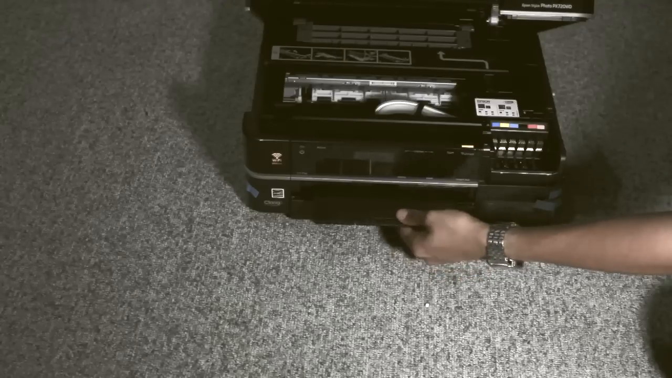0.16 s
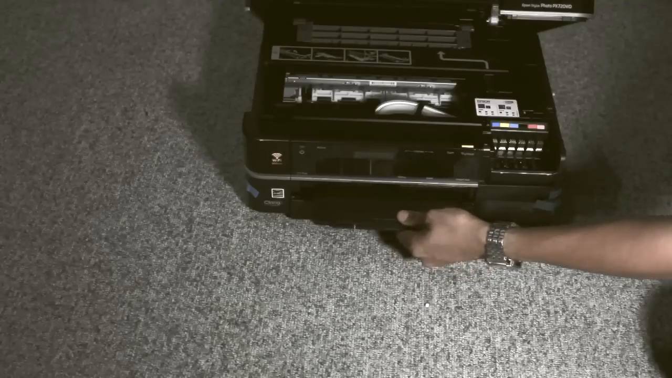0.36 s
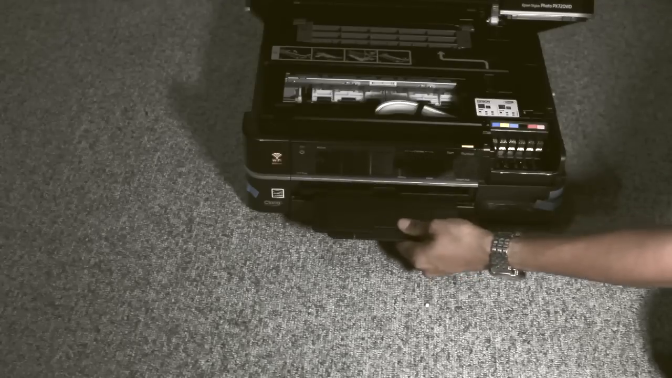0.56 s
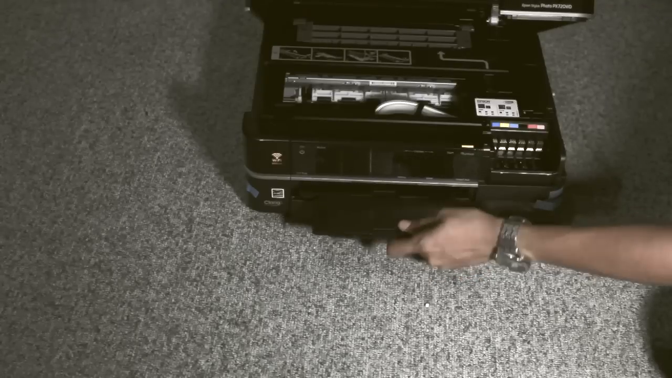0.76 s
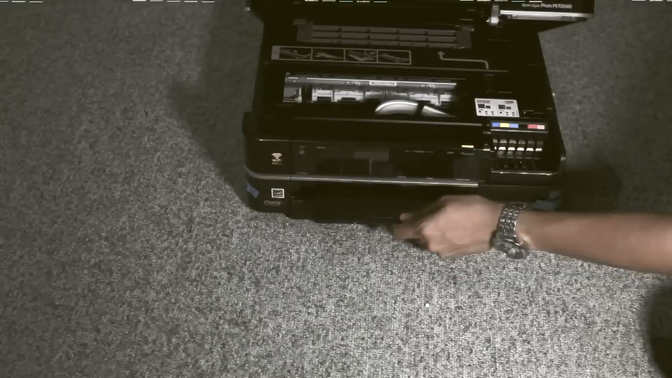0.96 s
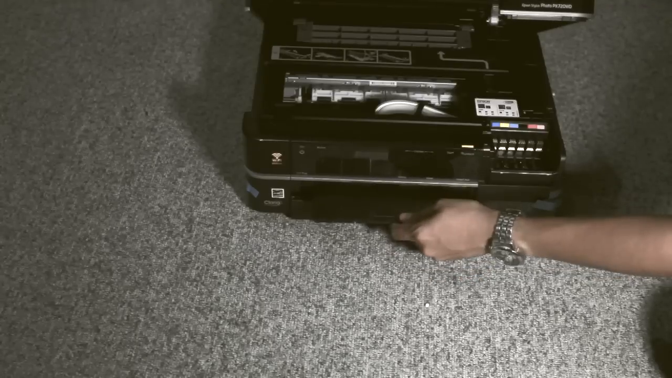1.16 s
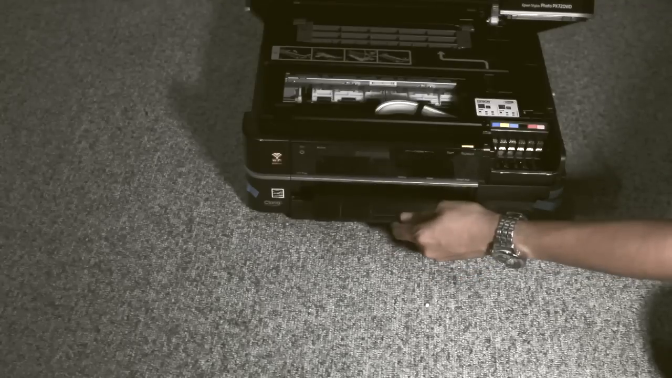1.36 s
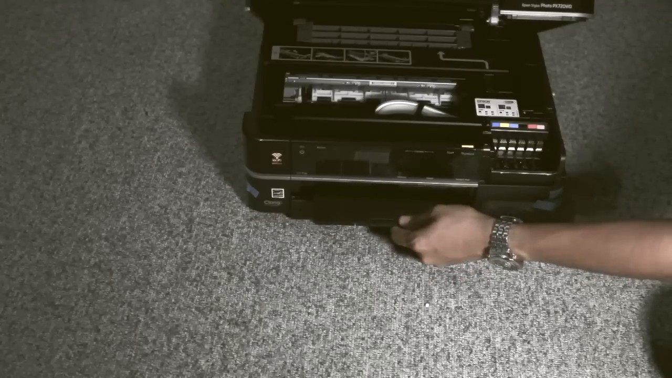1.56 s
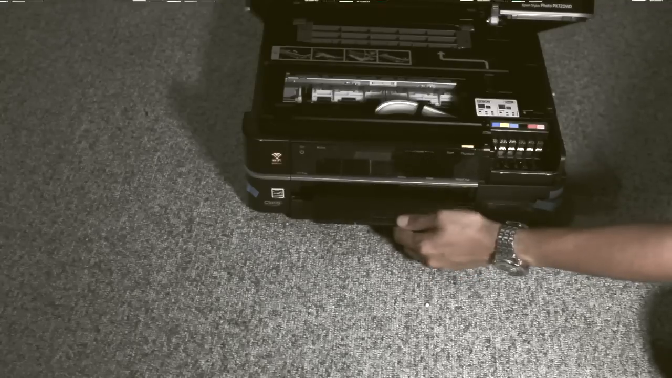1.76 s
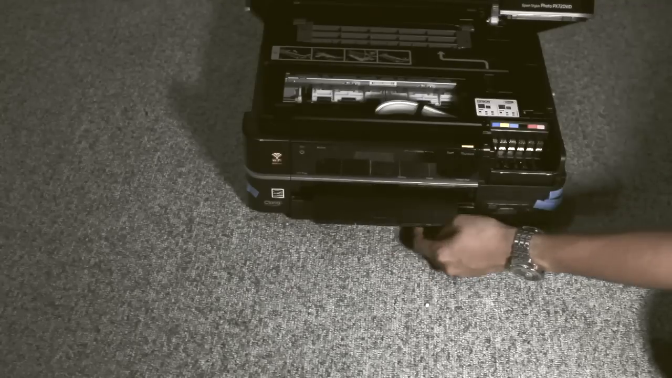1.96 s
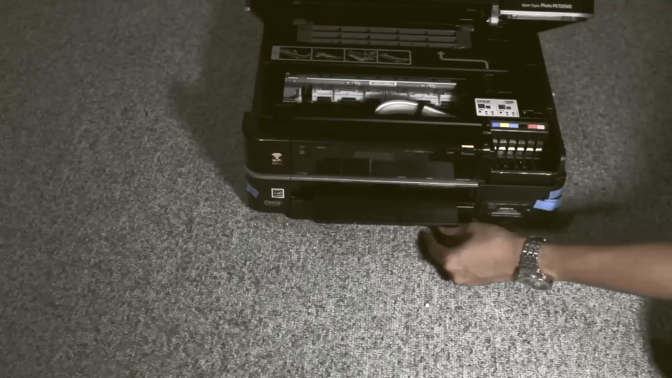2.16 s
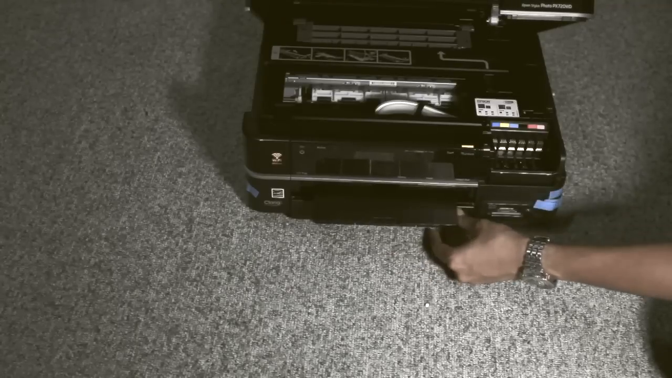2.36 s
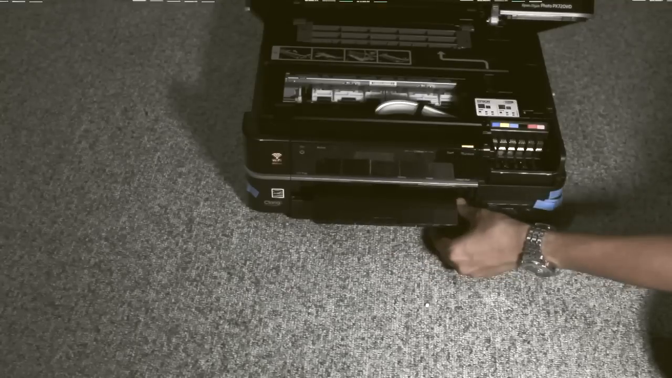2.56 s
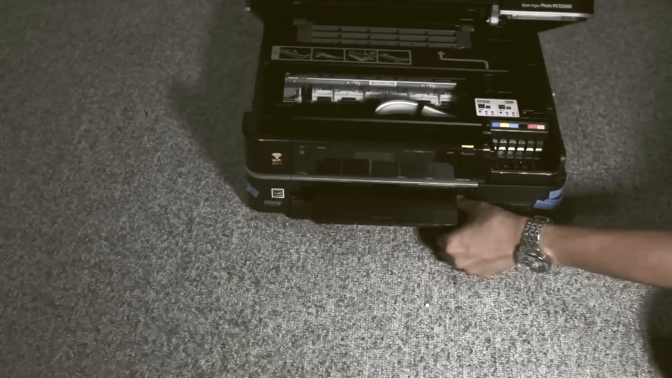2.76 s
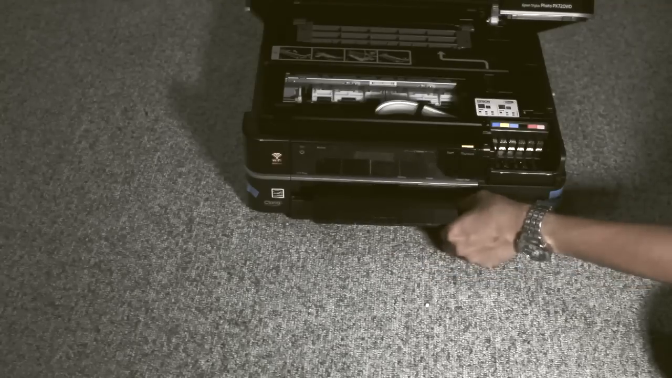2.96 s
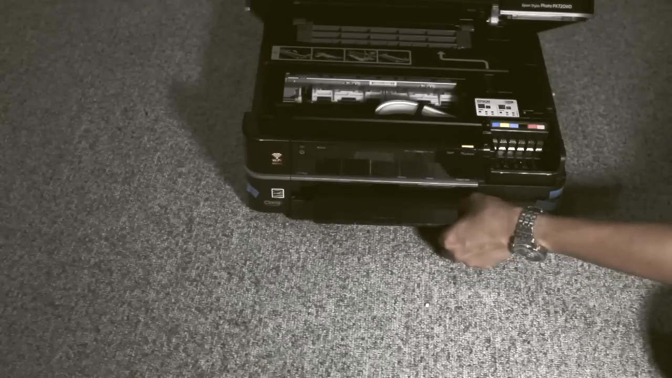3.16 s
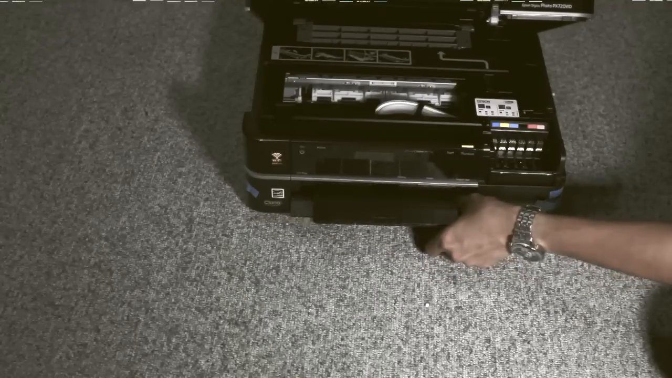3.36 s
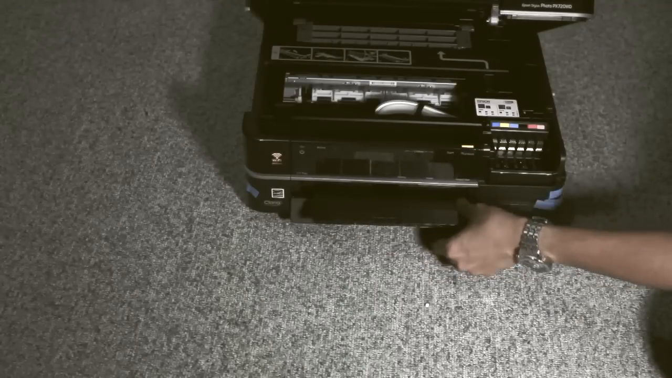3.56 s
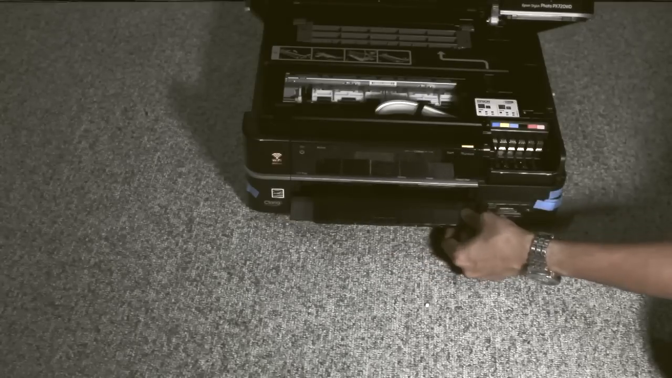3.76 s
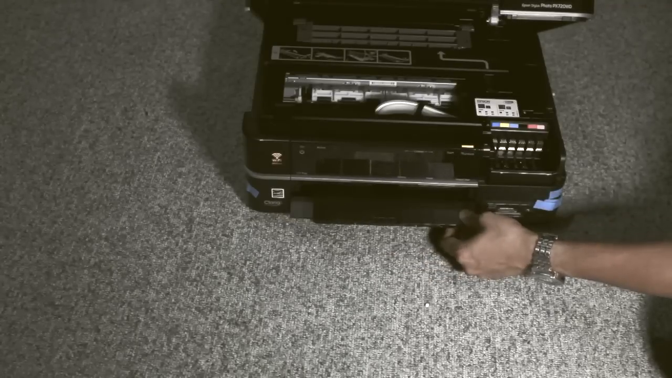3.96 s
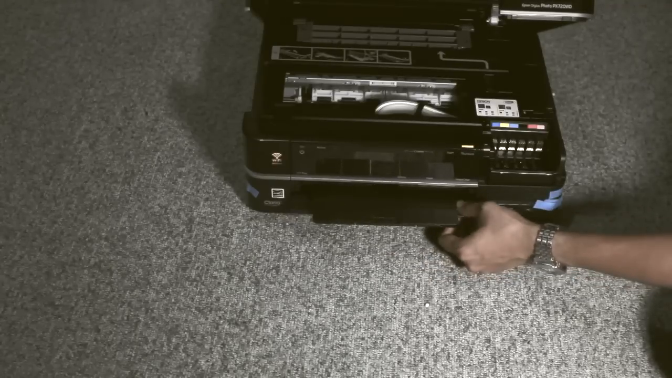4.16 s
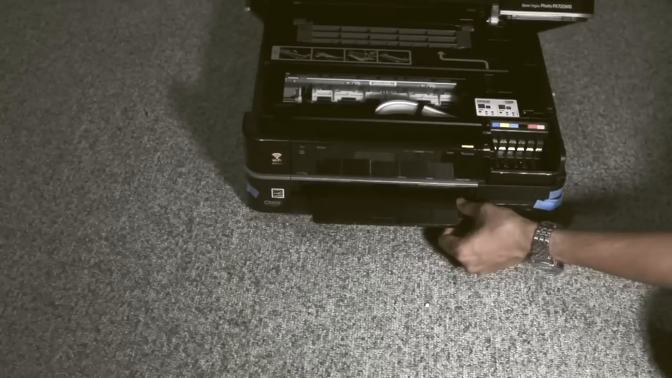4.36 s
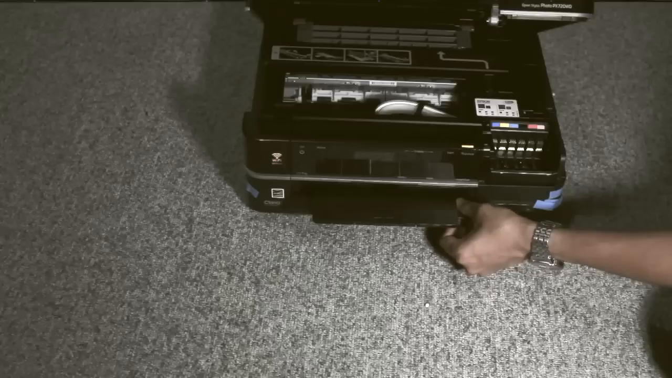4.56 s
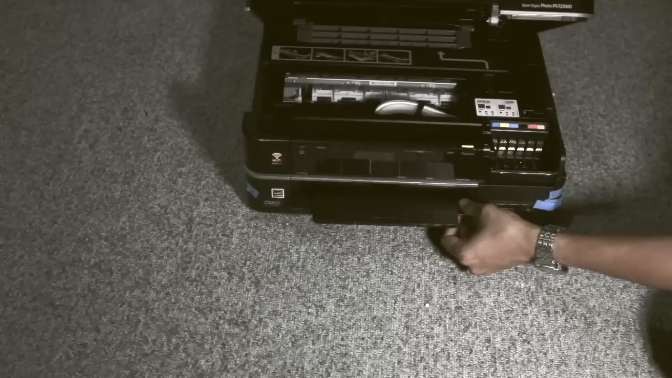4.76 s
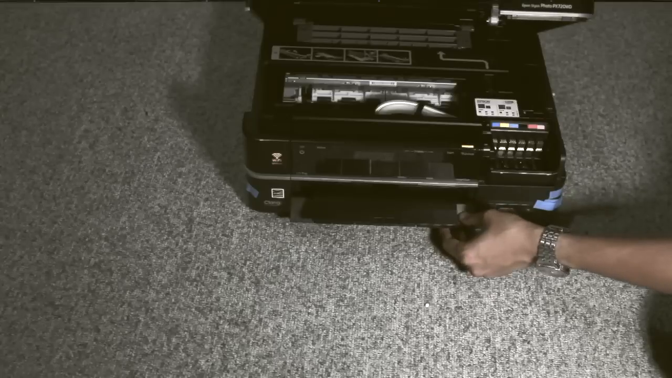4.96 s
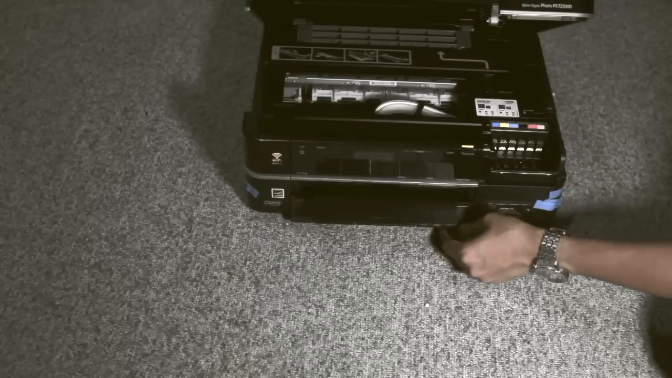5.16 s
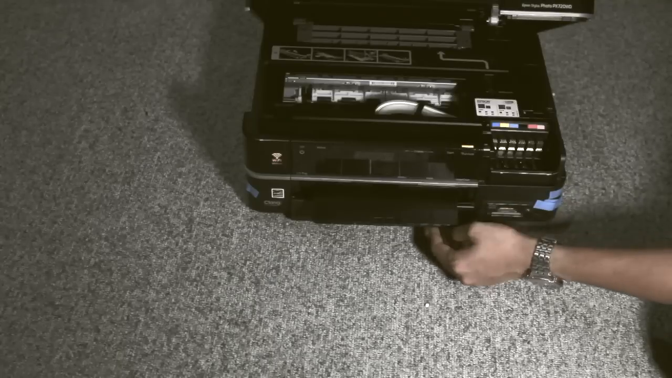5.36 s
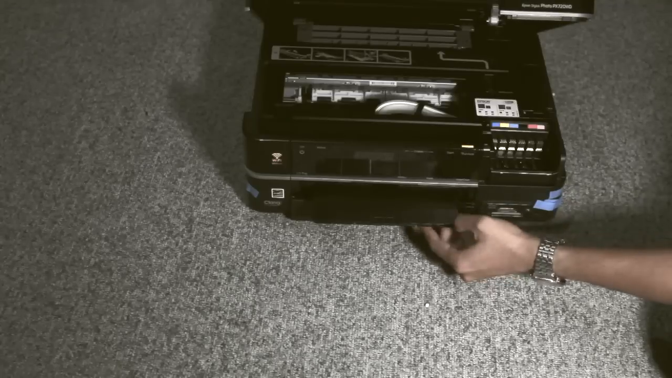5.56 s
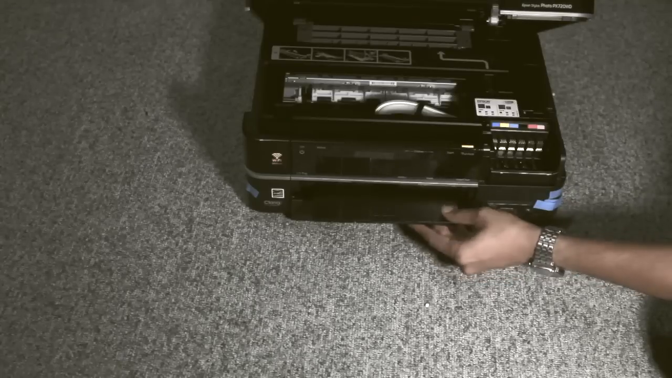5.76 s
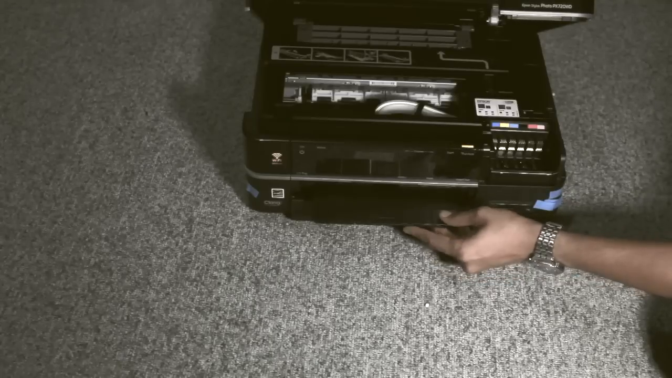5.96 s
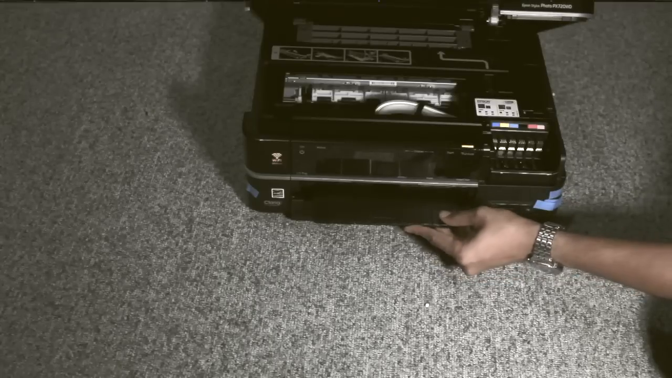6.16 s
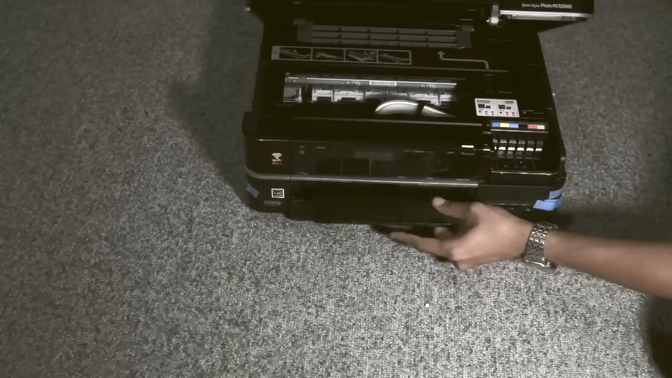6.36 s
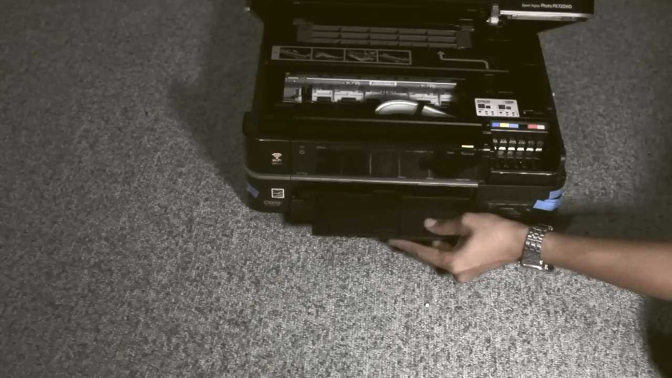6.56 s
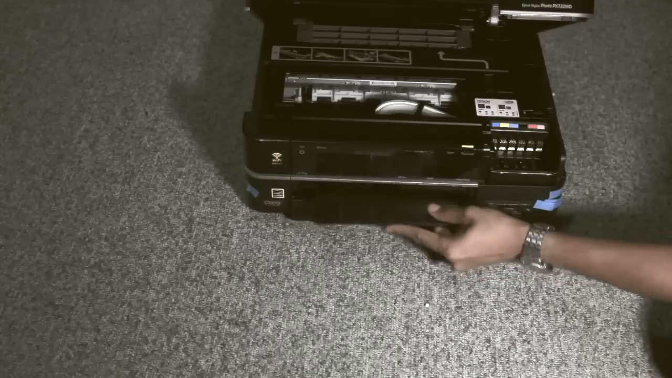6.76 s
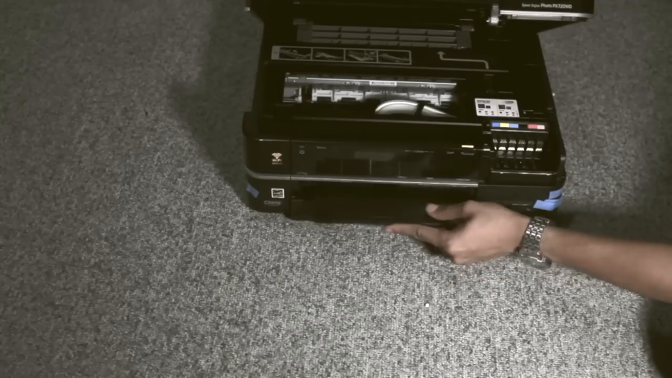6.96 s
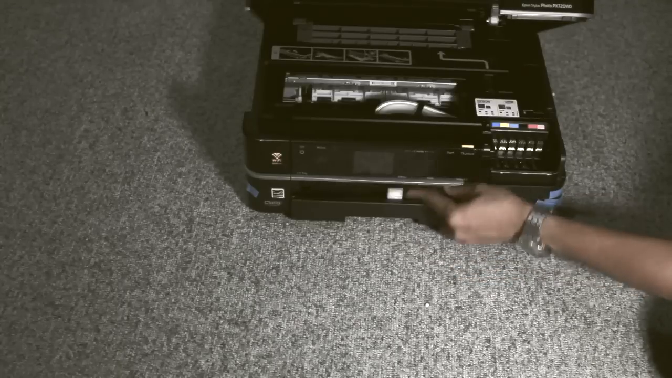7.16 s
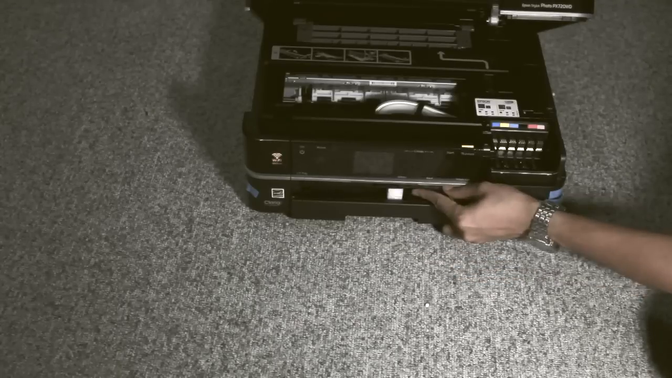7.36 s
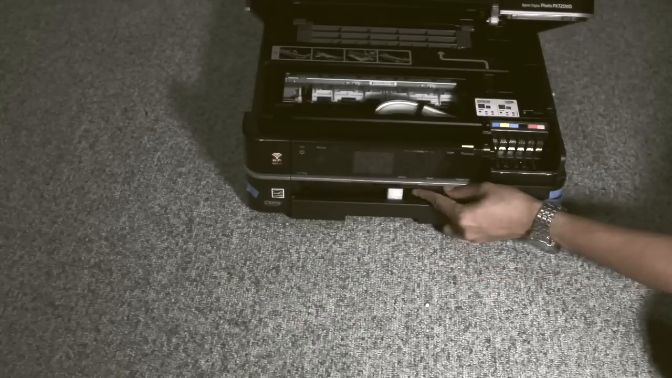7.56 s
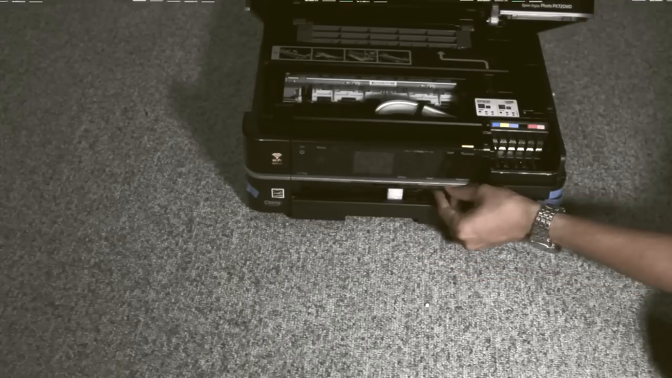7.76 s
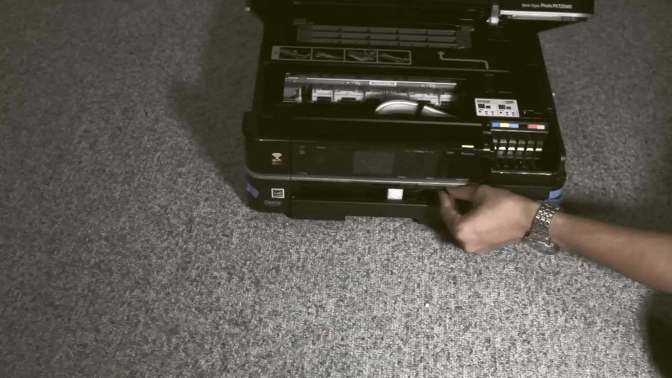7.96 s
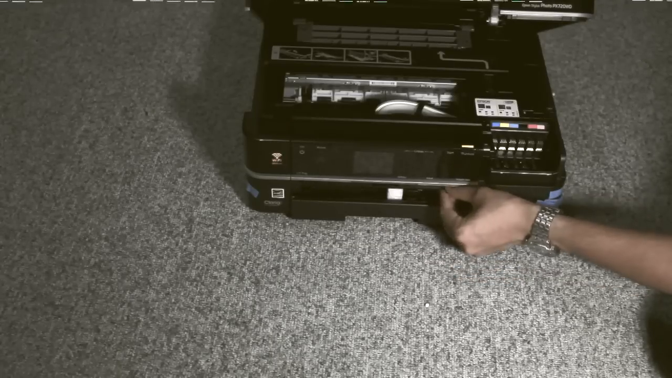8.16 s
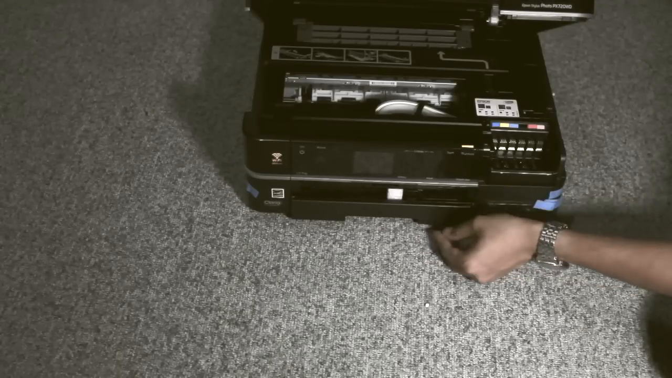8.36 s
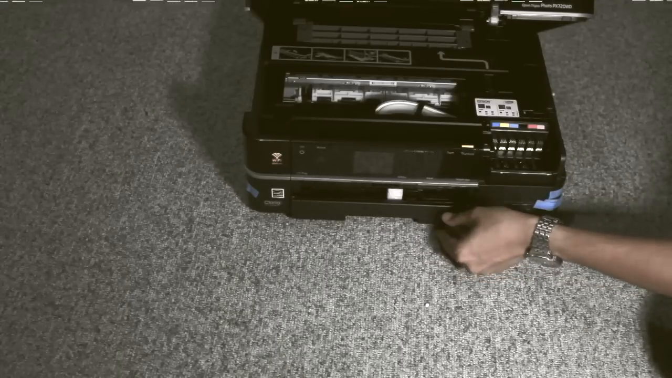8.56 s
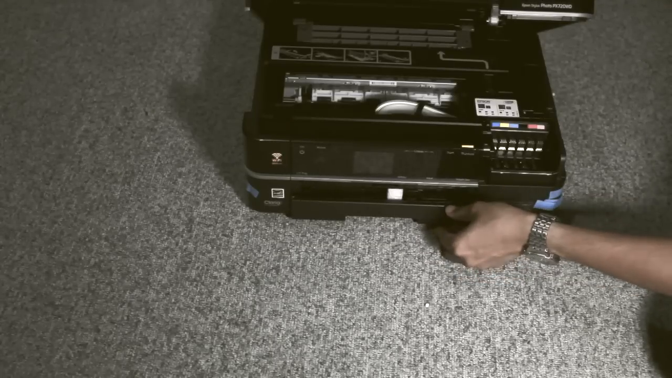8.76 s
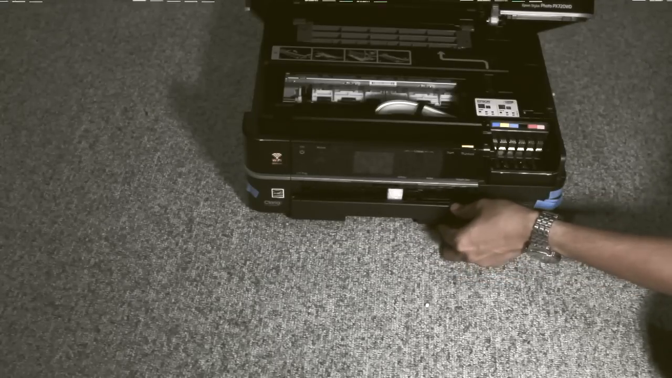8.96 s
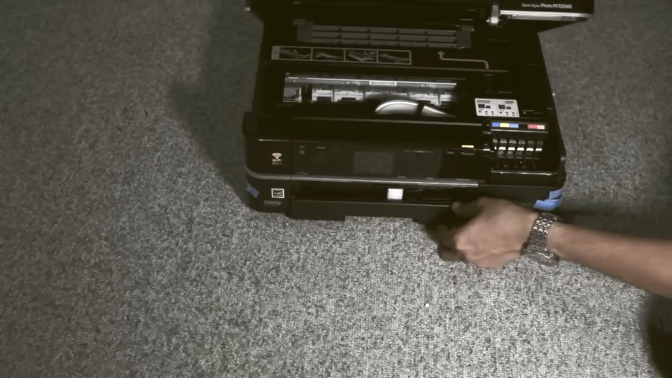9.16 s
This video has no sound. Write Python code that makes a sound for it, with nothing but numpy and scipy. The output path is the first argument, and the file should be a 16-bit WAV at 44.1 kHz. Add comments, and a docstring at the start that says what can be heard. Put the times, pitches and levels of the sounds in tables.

```python
"""At once a hand works a plastic tray in and out of an office machine: each contact is a short chatter of slips
that excites the resonant modes of the tray. Between contacts skin and plastic rub faintly as patches of
narrow-band noise, and a few faint narrow tones, rings of the tray, are noise in one narrow band each.
Under everything lies a quiet carpeted room: its air, a low hum and recorder hiss, as shaped noise and
slowly wavering tones. A short noisy tail follows each blow, and a diffuse field follows all tray sounds.
"""
import sys
import numpy as np
from scipy import signal
from scipy.fft import rfft, irfft
from scipy.io import wavfile
from scipy.ndimage import uniform_filter1d

SR = 44100
rng = np.random.default_rng(int(sys.argv[2]) if len(sys.argv) > 2 else 0)


def waveform_to_disk(signal):
    """Save audio, clipped to [-1, 1], as 16-bit WAV at the path in sys.argv[1]."""
    frames = np.transpose(np.atleast_2d(signal))
    scaled = np.clip(frames, -1, 1) * 32767
    samples = np.round(scaled).astype(np.int16)
    wavfile.write(sys.argv[1], SR, samples)


N = 405275

# Spectral shape of the air and hiss. Each row: frequency in Hz, relative density in dB per Hz.
AIR_SPECTRUM = [(20, -30.5), (34, -22), (44, -22.5), (60, -21), (80, -25.5), (100, -29.5), (135, -31),
                (165, -31.5), (210, -27), (380, -34.5), (610, -35.5), (1310, -43), (5230, -36.5),
                (9200, -43), (14600, -43.5), (15800, -50)]
AIR_DB = -70.5   # rms of both channels together
# Left-right likeness of the air noise. Each row: frequency in Hz, correlation from -1 to 1.
AIR_LIKENESS = [(60, -0.79), (180, 0.43), (550, -0.025), (1650, -0.15), (4970, -0.43), (15000, 0.23)]
# Wavering hum tones. Each row: frequency in Hz, left and right levels in dB rms about which they waver.
HUM_TONES = [(40.7, -88, -94.5), (52.3, -83, -87)]
# Far low swells. Each row: centre in seconds, half length in seconds, frequency in Hz, peak amplitude in dB.
FAR_SWELLS = [(3.447, .08, 75.6, -84), (3.75, 0.25, 68.2, -75), (6.31, 0.21, 60.7, -73)]

# Rubbing of hand and tray. Each row: time in seconds, dull drag in dB rms, bright scuff in dB rms.
RUBBING = [(0.0, -70, -72), (0.38, -81.5, -79.5), (0.76, -80.5, -76.5), (0.85, -60, -68), (1.0, -70, -75),
           (1.2, -82.5, -81.5), (1.61, -84, -78), (2.56, -84, -78), (3.27, -81.5, -80.5), (3.33, -64, -61),
           (3.44, -63, -68), (3.55, -75.5, -77.5), (3.75, -88, -81), (4.32, -78.5, -76.5), (4.79, -86, -79),
           (5.6, -82, -78), (6.0, -87.5, -81), (6.5, -73.5, -75.5), (6.99, -73, -74.5), (7.86, -81.5, -81),
           (8.011, -84, -79.5), (8.4, -79, -78), (8.68, -79.5, -81), (8.96, -89.5, -78), (9.19, -77.5, -80)]

# Contacts of the tray. Each row: time of the crack in seconds, click level in dB (loudest 5 ms rms),
# panel thud in dB re the click, bright edge in dB re the click, favoured pitch in Hz,
# swell time constant in ms, chatter decay time constant in ms.
CONTACTS = [(0.0216, -67, 0, -9, 1820, 2.2, 12), (0.148, -68, 5, -3, 560, 2.3, 8.6),
            (0.17, -49, -7, -4, 5050, 0.65, 6.3), (0.3314, -62.5, -14, -10, 3250, 14, 6.9),
            (0.408, -57.5, 3, -9, 3080, 10.6, 21), (0.4263, -52, -4.5, -9, 2370, 0.68, 4.4),
            (0.444, -70, 7, -13, 600, 3.3, 5.8), (0.521, -58, -6.5, -2, 1150, 0.5, 5.2),
            (0.787, -45.5, -12.5, -2.5, 3300, 0.49, 6.9), (0.8156, -31.5, -11.5, -1.5, 3330, 0.47, 8.5),
            (0.866, -42.5, -9, 0.5, 2410, 1.1, 15), (0.8815, -33, -2.5, -10, 2340, 2.4, 7),
            (0.892, -34.5, -13, -2, 930, 5.6, 8), (1.184, -72.5, -5, -3, 3180, 4, 13),
            (1.268, -71.5, -7, -4, 1740, 3.9, 46), (1.307, -52.5, -16, 0.5, 4540, 0.55, 4.9),
            (1.3333, -66, -8, -19, 3060, 8, 7.1), (1.4887, -69, -2, -23, 2580, 1.1, 17),
            (1.553, -66.5, -8, -8, 3250, 0.6, 12), (1.765, -67.5, -7, -1, 2450, 0.6, 17),
            (1.7997, -69.5, -5, -2, 2440, 2.9, 10), (2.101, -69, -10, -3, 2760, 3.2, 13),
            (2.1804, -59.5, -6.5, 1.5, 2960, 0.8, 11), (2.2074, -60.5, -6.5, -2, 3400, 7.4, 13),
            (2.518, -76, 4.5, -11, 620, 4, 13), (2.5917, -75.5, 8.5, -5, 1000, 5.5, 4.6),
            (2.7826, -67.5, -5, -6, 1140, 3.2, 21), (2.8274, -75, -1, -4, 860, 4, 4.6),
            (2.92, -61, 7, -14, 570, 2.4, 8.3), (2.928, -68, 6, -6, 610, 36, 23),
            (2.9783, -66, -9, -6, 3060, 4, 18), (3.2423, -76, 3, 3, 1110, 3.4, 17),
            (3.286, -69, -9, 3, 6540, 9.4, 4.4), (3.2985, -34.5, -11, -2, 6170, 0.13, 4.7),
            (3.374, -51.5, 1, -12, 851, 2.4, 13), (3.4185, -50, -10, -5.5, 800, 1.3, 7),
            (3.4555, -47, -8, -7.5, 3840, 0.54, 6.1), (3.59, -74.5, 2, -4, 1600, 2.8, 6),
            (3.7161, -67, -5.5, -12, 3800, 0.65, 9), (4.1594, -74.5, 12, -14, 776, 19, 7.8),
            (4.179, -75.5, 9, -7, 790, 8.2, 21), (4.2332, -61, -2, -5, 3500, 15, 20),
            (4.264, -76, 9, -8, 870, 4.5, 8.9), (4.3259, -56, -5, -7.5, 800, 9.9, 17),
            (4.529, -74, -7, -5, 935, 4, 14), (4.7034, -65.5, 4.5, -16, 784, 8.1, 8.6),
            (5.153, -53, -10, -12.5, 4000, 0.28, 3), (5.187, -71, 1, -4, 1650, 21, 8.2),
            (5.2455, -75.5, 3.5, -8, 900, 5.6, 4.4), (5.7323, -62, 4, -8, 560, 2.1, 30),
            (5.7676, -56.5, -23, .6, 4030, 0.48, 4.7), (5.9507, -63.5, -0.5, -5.5, 530, 4.9, 22),
            (5.971, -69.5, 10, -7, 590, 5.6, 12), (6.3195, -74, -12, 0, 3620, 2.6, 6.8),
            (6.3414, -69, -1.5, -0.5, 2980, 3.5, 20), (6.3637, -61, -17, -9, 1550, 4, 9.8),
            (6.3863, -59.5, -5, -7, 2930, 3.6, 6.1), (6.3991, -49.5, -8.5, -7.5, 2540, 0.73, 6.2),
            (6.4535, -56, -4.5, -2, 3340, 6.6, 11), (6.4658, -49.5, -10, 1.7, 4570, 4.7, 5.3),
            (6.4974, -56, -6, -14, 2790, 2.6, 25), (6.5252, -58, 2.5, -20, 945, 5.5, 14),
            (6.5373, -52.5, -3.5, -6.5, 560, 1.6, 6.9), (6.553, -59, -3.5, -9, 920, 7.9, 7.5),
            (6.7902, -45.5, -8.5, -1.5, 2380, 2.5, 23), (6.8145, -33, -5, -7, 2420, 3.8, 10.8),
            (6.8708, -60, 4.5, 2, 825, 4, 12), (7.0745, -63, -8, -8, 3200, 0.6, 6.1),
            (7.1296, -32.5, -12.5, -2, 4860, 1.2, 9.1), (7.145, -42.5, -5.5, -3, 3460, 3.8, 34),
            (7.1896, -45.5, -8, 1.5, 3860, 8.1, 14), (7.203, -27, -4.5, 2, 2980, 0.71, 3.3),
            (7.208, -25, -9.5, -1.5, 4300, 3.3, 6.8), (7.503, -82, 19, -5, 582, 5, 8.3),
            (7.6566, -81, 14, -3, 924, 4.8, 9), (7.7232, -63.5, -13, -11, 3180, 0.86, 8.5),
            (8.157, -70.5, -5, -7, 629, 4.3, 10), (8.207, -72.5, -3.5, -14, 1070, 12, 23),
            (8.244, -65, -3, -5.5, 600, 2, 25), (8.4595, -58, -5.5, -8.5, 2170, 0.42, 7.9),
            (8.9787, -68.5, -2, -5.5, 963, 0.6, 22), (9.005, -70.5, 9.5, -6.5, 770, 0.6, 5.9)]
# Resonant modes of the tray. Each row: frequency in Hz, bandwidth in Hz, mean strength in dB.
TRAY_MODES = [(228, 160, -8), (310, 65, 0), (432, 41, -6), (530, 58, -1.5), (610, 44, -0.5),
              (783, 84, -1.5), (929, 162, -3.5), (1003, 103, 3.5), (1329, 610, 3.5), (1600, 420, 5),
              (1866, 170, 0), (2230, 500, -1), (2470, 180, 1), (2933, 410, 2), (3300, 220, 1),
              (3510, 190, 1), (4180, 580, 3), (4560, 480, 1.5), (5185, 480, 0), (5700, 850, 4),
              (6350, 1540, 3.5), (6890, 360, -2.5), (7600, 1500, -5.5), (9340, 1400, -13.5),
              (10760, 1800, -22.5), (11100, 910, -10.5), (13140, 980, -12), (15000, 1600, -20.5)]
# Upper limits in Hz of the panel thud, the hollow knock and the click; the bright edge lies above.
PART_TOPS_HZ = [850, 2000, 5000]
# Direct sound unlike at the two ports. Each row: frequency in Hz, side strength in dB re mid.
PORT_SIDE = [(300, -16.5), (2000, -23), (3500, -17.5), (6000, -10), (14000, -13)]
# Knock re the click: dB at thud 0 dB, share of the thud's dB it follows, extra dB when touched in its range.
KNOCK_DB, KNOCK_FOLLOWS, KNOCK_FAVOURED_DB = -2, 0.52, 5
THUD_LAG_MS, KNOCK_LAG_MS = 4.0, 1.2   # the larger parts answer later
FIRST_SLIP = 9.0   # size of the opening crack re the chatter, before a slow swell softens it

# Reverberation of the room. Each row: frequency in Hz, 60 dB decay time in seconds.
ROOM_T60 = [(200, 0.52), (530, 0.42), (1390, 0.37), (3680, 0.32), (9700, 0.32)]
ROOM_DB = -8   # gain on the diffuse field
ROOM_LIKENESS = 0.34   # left-right correlation of the field
FIRST_WALL_S = 0.003   # build-up time constant

# Faint narrow tones, rings of the tray. Each row: centre in seconds, pitch in Hz,
# level in dB rms at the top of the swell.
RING_TONES = [(1.446, 1075, -77.5), (1.679, 5230, -76), (2.395, 2270, -76.5), (3.53, 1600, -68.5),
              (4.0, 5130, -77), (4.74, 800, -73), (5.135, 1486, -71), (5.929, 1600, -79), (8.39, 2980, -78)]
RING_HALF_S, RING_WIDTH = 0.033, 0.034   # half length in s; share of the pitch either side

# Resting offset of the converter. Each row: one channel, left then right, in parts of full scale.
CONVERTER_OFFSET = [
    [-0.00285],
    [0.00694],
]
CUTOFF_HZ = 16300   # edge of the stop band


def from_db(db):
    """Level law: an amplitude gain is ten to the power of dB over 20."""
    return 10 ** (np.asarray(db) / 20)


def rms_one(x):
    """Normalisation: division by the root mean square gives unit power."""
    return x / np.sqrt(np.mean(x ** 2) + 1e-20)


def loudest(x):
    """Short-time power: the highest rms over 5 ms."""
    return np.sqrt(uniform_filter1d(x ** 2, size=220).max() + 1e-20)


def at_hz(points, hz):
    """Logarithmic frequency scale: a table is interpolated linearly in log frequency."""
    table = np.array(points)
    return np.interp(np.log(hz), np.log(table[:, 0]), table[:, 1])


def drift(rate_hz):
    """Random modulation: noise through a double low-pass pole wanders slowly with rms 1."""
    step = 40   # samples between drawn points
    pole = np.exp(-2 * np.pi * rate_hz * step / SR)
    noise = rng.standard_normal(N // step + 2002)
    slow = signal.lfilter([1], [1, -2 * pole, pole * pole], noise)[2000:]   # settled part only
    return np.interp(np.arange(N) / step, np.arange(len(slow)), rms_one(slow))


def band(x, low_hz, high_hz):
    """Band-pass filtering: only energy near the chosen range is passed."""
    sos = signal.butter(2, [low_hz, min(high_hz, .45 * SR)], "band", fs=SR, output="sos")
    return signal.sosfilt(sos, x)


def mid_side(mid, side, likeness):
    """Correlation of two channels: the ratio of shared to opposed noise power sets their likeness."""
    return np.sqrt(1 + likeness) * mid + np.sqrt(1 - likeness) * side * [[1], [-1]]


def air():
    """Spectral shaping of noise: weighted white noise gives room air below and recorder hiss above."""
    hz = np.maximum(np.fft.rfftfreq(N, 1 / SR), 1)
    mid, side = rfft(rng.standard_normal((2, N)))
    likeness = np.clip(at_hz(AIR_LIKENESS, hz), -.95, .95)
    both = mid_side(mid, side, likeness)
    lean_db = 2.8 * np.exp(-(hz / 140) ** 2) * np.array([[-1], [1]])   # the bass is stronger on the right
    shaped = both * from_db(at_hz(AIR_SPECTRUM, hz) + lean_db)
    return from_db(AIR_DB) * rms_one(irfft(shaped, N))


def hum():
    """Modulated sinusoids: low tones waver in level and phase, and far swells have Gaussian envelopes."""
    t = np.arange(N) / SR
    out = np.zeros((2, N))
    for hz, left_db, right_db in HUM_TONES:
        peak = np.sqrt(2) * from_db([[left_db], [right_db]] + 4.1 * drift(2.5))
        out += peak * np.sin(2 * np.pi * hz * t + 1.1 * drift(1.1))
    for s, half_s, hz, level_db in FAR_SWELLS:
        envelope = np.exp(-((t - s) / half_s) ** 2)
        out += from_db(level_db) * envelope * np.sin(2 * np.pi * hz * t)
    return out


def blow_tail(level_db, rise_s, fade_s):
    """Energy storage: the power of each blow passes two decays in turn, so a short noisy tail follows it."""
    s, click_db = np.transpose(CONTACTS)[:2]
    blows = np.zeros(N)
    blows[(s * SR).astype(int)] = from_db(2 * (click_db + level_db))   # doubled dB: power
    rise, fade = np.exp(-1 / (np.array([rise_s, fade_s]) * SR))
    power = signal.lfilter([1 - rise], np.convolve([1, -rise], [1, -fade]), blows + 1e-18)
    return np.sqrt(power)


def rubbing():
    """Friction noise: narrow bands that wander in level form a dull drag and a bright scuff."""
    s, drag_db, scuff_db = np.transpose(RUBBING)
    t = np.arange(N) / SR
    drag, scuff = np.zeros(N), np.zeros(N)
    for hz in (293, 509, 800, 1150, 1600):
        patch = band(rng.standard_normal(N), hz / 1.5, hz * 1.216)
        drag += patch * from_db(3.3 * drift(11.0))
    for hz in np.arange(2300, 7300, 500):
        patch = band(rng.standard_normal(N), hz - 170, hz + 170)
        scuff += patch * from_db(4 * drift(8) - max(0, hz - 5500) / 300)
    # the rubbing and the tail after each blow share the noise; their powers add
    drag_gain = np.hypot(from_db(np.interp(t, s, drag_db)),
                         blow_tail(level_db=-27, rise_s=0.014, fade_s=0.041))
    scuff_gain = np.hypot(from_db(np.interp(t, s, scuff_db)),
                          blow_tail(level_db=-24.5, rise_s=0.033, fade_s=0.028))
    return drag_gain * rms_one(drag) + scuff_gain * rms_one(scuff)


def ringing(hz, width_hz, t):
    """Damped resonance: the bandwidth fixes the decay; returns spectra of the sine and the cosine."""
    ring = np.exp((2j * np.pi * hz - np.pi * width_hz) * t) * np.sqrt(width_hz)
    return rfft(ring.imag), rfft(ring.real)


def contacts(size=4096, lead=1024):
    """Modal excitation: a swelling and dying chatter of slips drives modes of random strength per contact."""
    hz, width_hz, mode_db = np.transpose(TRAY_MODES)[:, :, None]
    t = np.arange(size) / SR
    held_mid, held_side = ringing(hz, width_hz, t)
    free_mid, free_side = ringing(hz, .4 * width_hz, t)   # less damped
    # one row each for thud, knock, click and edge
    part = np.searchsorted(PART_TOPS_HZ, hz[:, 0]) == np.arange(4)[:, None]
    lag_ms = np.array([[THUD_LAG_MS], [KNOCK_LAG_MS], [0], [0]])
    part_lag = np.exp(-2j * np.pi * np.fft.rfftfreq(size, 1000 / SR) * lag_ms)
    ms = 1000 * (t - lead / SR)   # time from the opening crack
    alternate = (-1) ** np.arange(len(hz))[:, None]
    out = np.zeros((2, N + 2 * size))
    for s, click_db, thud_db, edge_db, pitch_hz, swell_ms, chatter_ms in CONTACTS:
        touched = PART_TOPS_HZ[0] < pitch_hz < PART_TOPS_HZ[1]
        knock_db = KNOCK_DB + KNOCK_FOLLOWS * thud_db + KNOCK_FAVOURED_DB * touched
        # low modes near the spot touched ring on
        favour = np.exp(-(np.log(hz / pitch_hz) / 0.11) ** 2) / (1 + hz / 2500)
        hard_db = 0.46 * (click_db + 42.0) * (hz > 10000)   # harder blows reach the highest modes
        scatter_db = rng.normal(0, 3.14, hz.shape)
        strength = from_db(mode_db + hard_db + scatter_db) * alternate
        # a phase shift between the ports
        unlike = from_db(at_hz(PORT_SIDE, hz)) * rng.choice([-1, 1], hz.shape)

        swell = np.exp(ms / max(swell_ms, .05))
        decay = np.exp(-np.abs(ms) / max(chatter_ms, .2))
        force = np.where(ms < 0, swell, decay)
        crack = (np.arange(size) == lead) * FIRST_SLIP / (1 + swell_ms)
        noise = rng.standard_normal(size)
        grain = 0.43 + (rng.random(size) < .08) * 2.3   # occasional larger slips
        slips = part_lag * rfft(crack + force * noise * grain)

        mid = irfft(slips * (part @ (strength * (held_mid + 2.0 * favour * free_mid))))
        side = irfft(slips * (part @ (strength * unlike * (held_side + 2.2 * favour * free_side))))
        part_db = click_db + np.array([thud_db, knock_db, 0, edge_db])
        gains = from_db(part_db) / [loudest(m) for m in mid]
        at = round(s * SR)
        out[:, at:at + size] += gains @ mid + gains @ side * [[1], [-1]]
    return out[:, lead:N + lead]


def room(x):
    """Diffuse field: each third-octave band stores energy, loses it at its own pace and sounds as noise."""
    edges = 170 * 2 ** (np.arange(21) / 3)
    white = rng.standard_normal((2, 2, N))
    out = np.zeros((2, N))
    likeness = np.clip(ROOM_LIKENESS, 0, .95)
    spread = np.exp(-1 / (FIRST_WALL_S * SR))   # the field builds up as the first walls answer
    for k, (low, high) in enumerate(zip(edges, edges[1:])):
        t60 = at_hz(ROOM_T60, np.sqrt(low * high))
        keep = from_db(-120 / (t60 * SR))   # power kept per sample
        stored = signal.lfilter([(1 - keep) * (1 - spread)], np.convolve([1, -keep], [1, -spread]),
                                band(x, low, high) ** 2)
        mid, side = rms_one(band(white[k % 2], low, high))
        soaked = from_db(-1.2 * np.log2(high / 1000))   # carpet takes more of the treble
        out += soaked * np.sqrt(stored) * mid_side(mid, side, likeness)
    return out


def ring_tones():
    """Narrow-band noise: noise confined to one narrow band swells and dies as a Gaussian."""
    out = np.zeros(N + SR)
    t = np.linspace(-.15, .15, round(.3 * SR))
    envelope = np.exp(-(t / RING_HALF_S) ** 2)
    for s, hz, level_db in RING_TONES:
        at = round((s + t[0]) * SR)
        noise = rng.standard_normal(len(t))
        tone = rms_one(band(noise, hz * (1 - RING_WIDTH), hz * (1 + RING_WIDTH)))
        out[at:at + len(t)] += from_db(level_db) * envelope * tone
    return out[:N]


def scene(order=5):
    """Superposition: the tray near the middle, its diffuse field and the steady floor add linearly."""
    tray = contacts() + rubbing() + ring_tones()
    direct = tray * from_db([[.3], [-.3]])   # slightly to the left
    near = direct + from_db(ROOM_DB) * room(tray.mean(axis=0))
    # a light tray radiates no deep bass
    small = signal.butter(order, 185, "high", fs=SR, output="sos")
    return signal.sosfilt(small, near) + air() + hum()


def record(dry):
    """Band limitation: a steep low-pass cuts the top, then the converter's resting offset is added."""
    top_cut = signal.cheby2(20, 50, CUTOFF_HZ, fs=SR, output="sos")   # order, stop-band loss in dB
    return CONVERTER_OFFSET + signal.sosfilt(top_cut, dry)


dry = scene()
out = record(dry)
waveform_to_disk(out)
```